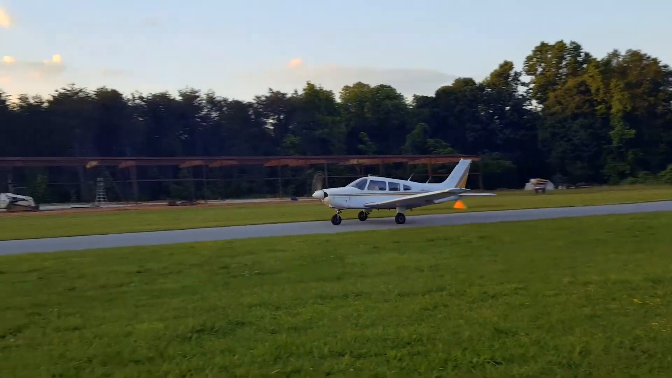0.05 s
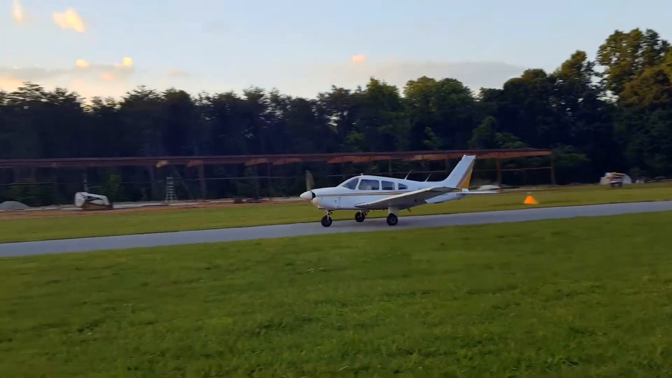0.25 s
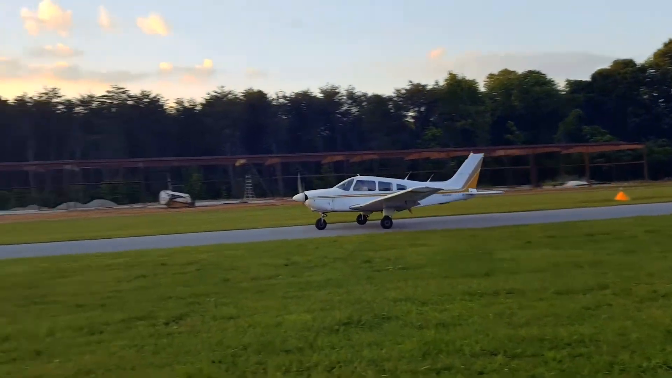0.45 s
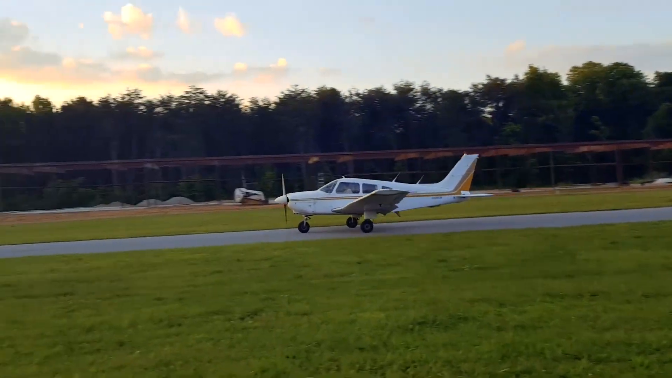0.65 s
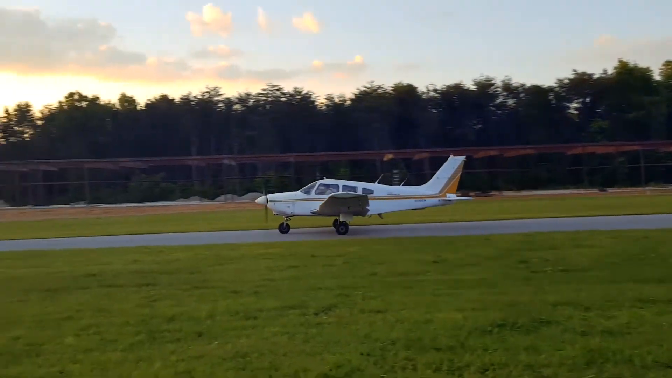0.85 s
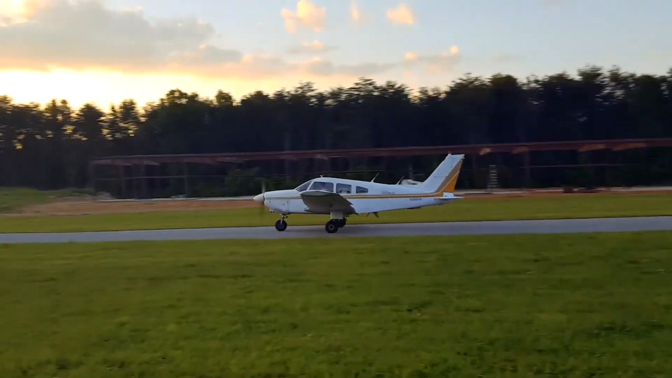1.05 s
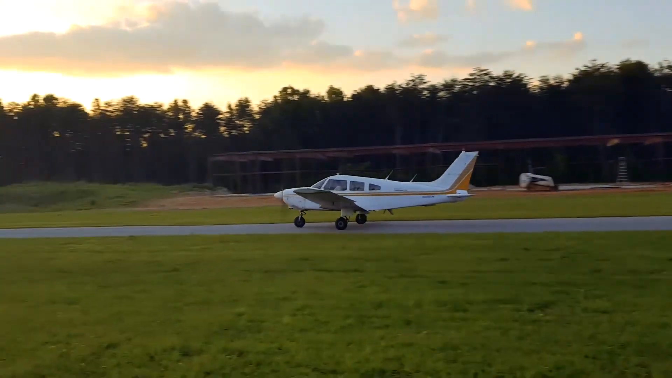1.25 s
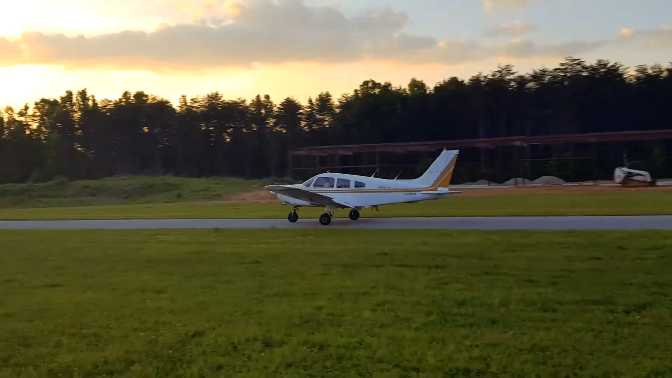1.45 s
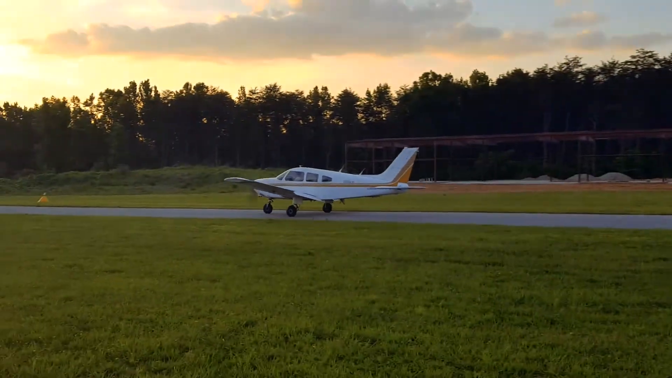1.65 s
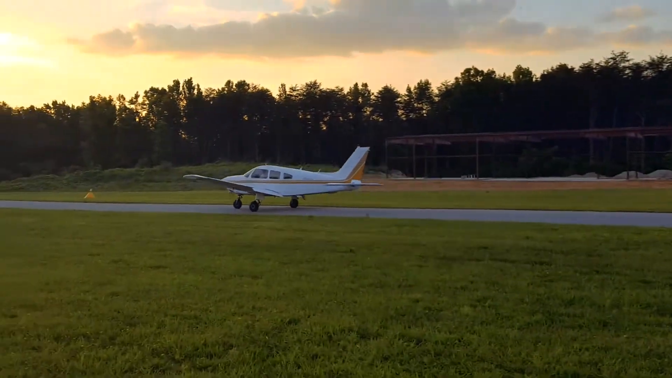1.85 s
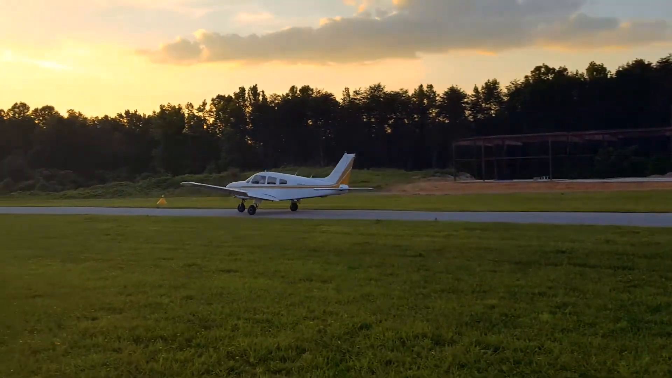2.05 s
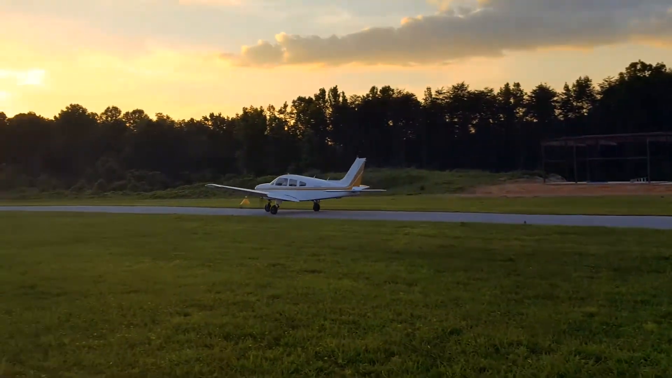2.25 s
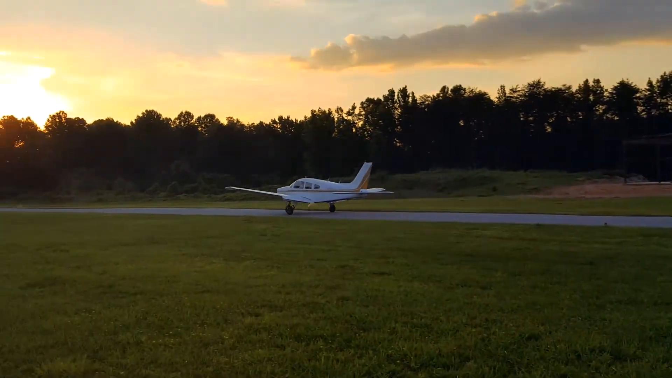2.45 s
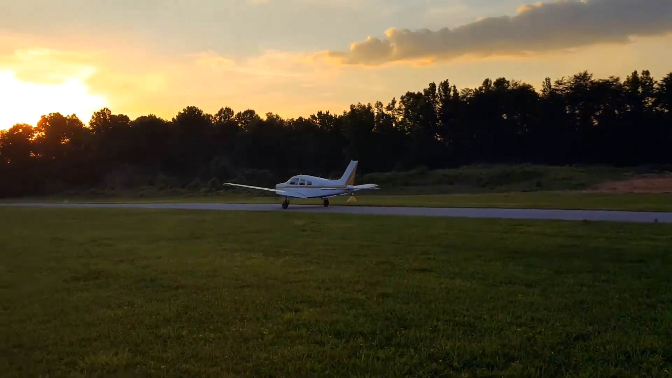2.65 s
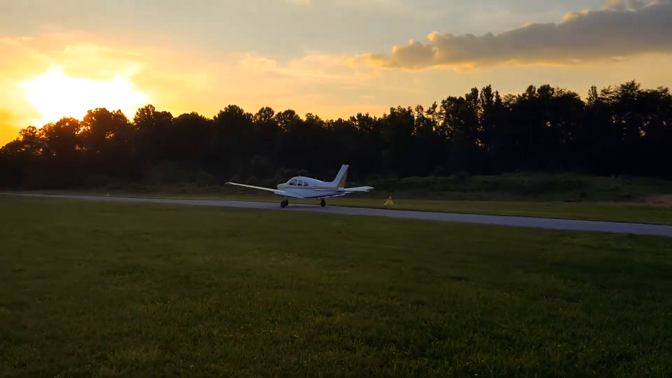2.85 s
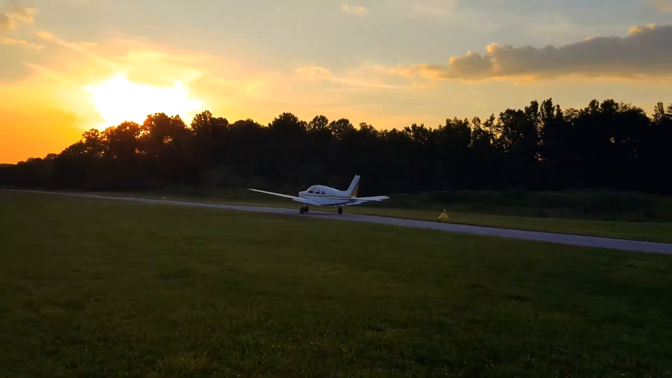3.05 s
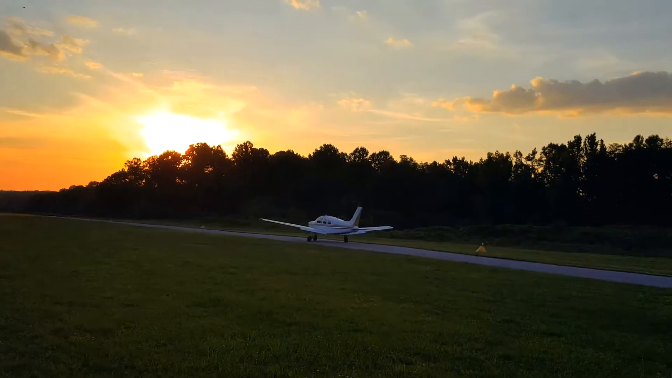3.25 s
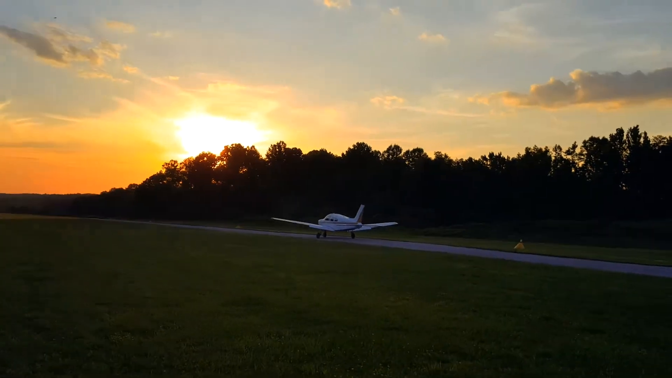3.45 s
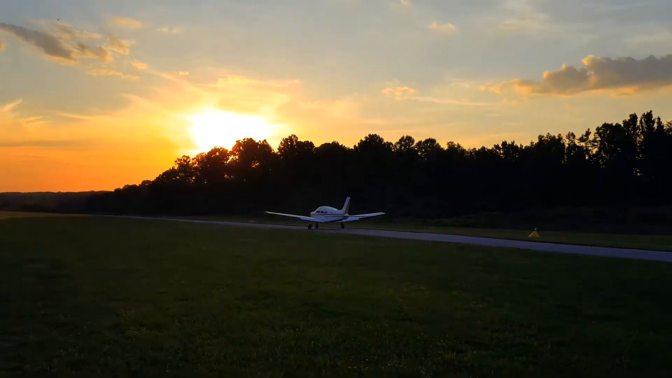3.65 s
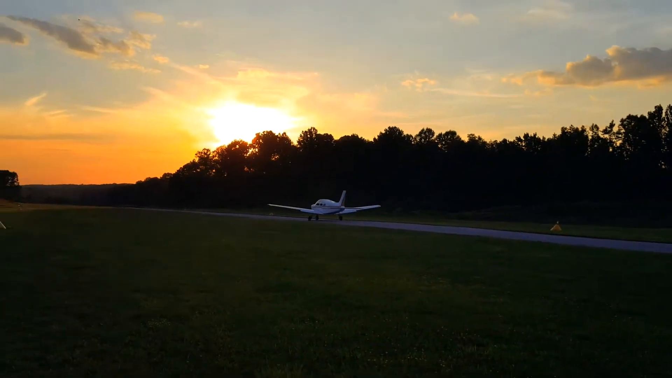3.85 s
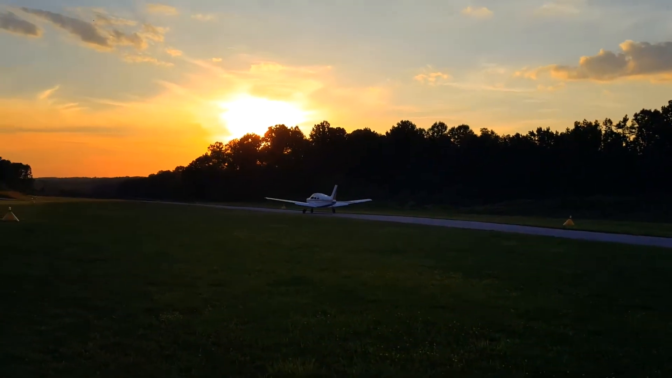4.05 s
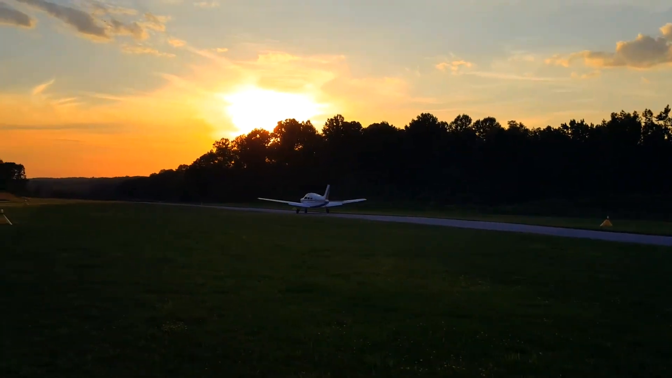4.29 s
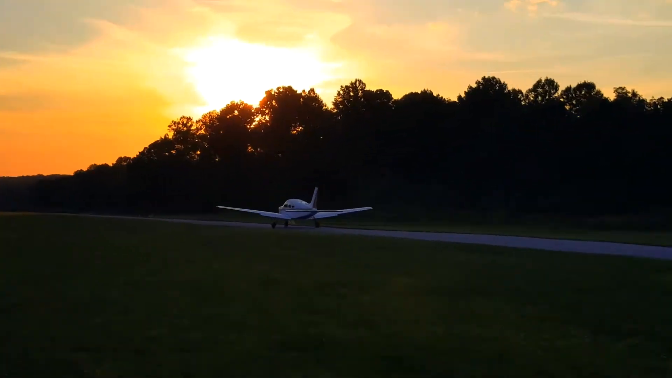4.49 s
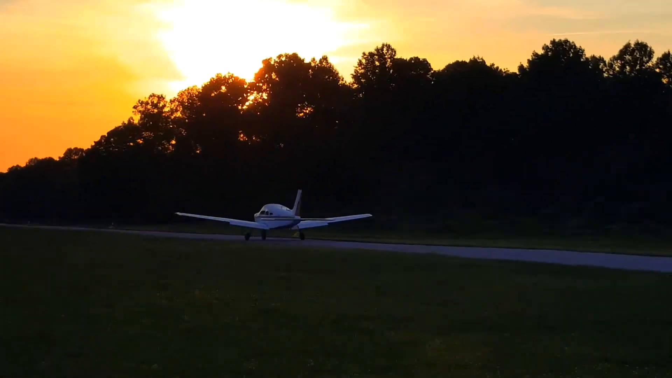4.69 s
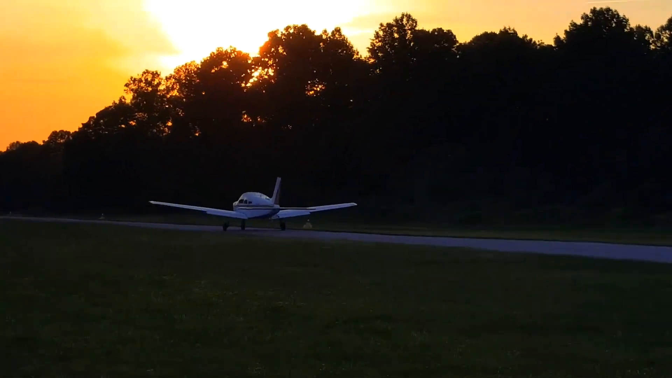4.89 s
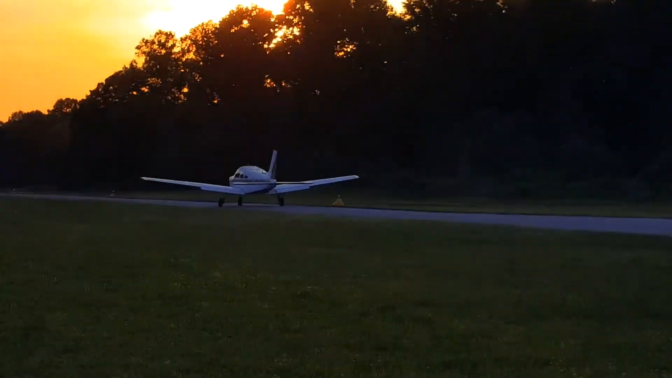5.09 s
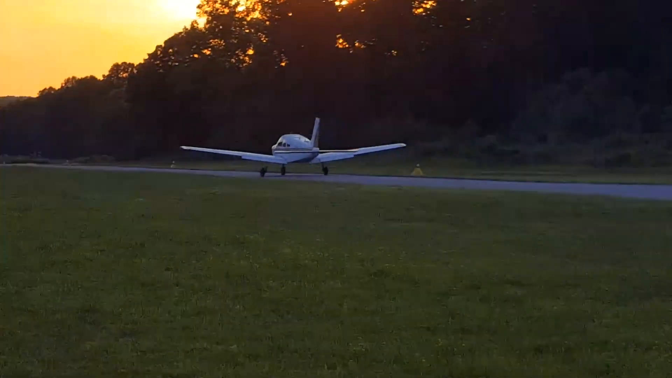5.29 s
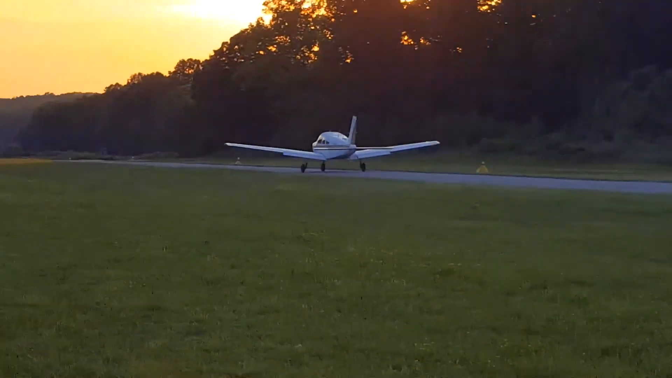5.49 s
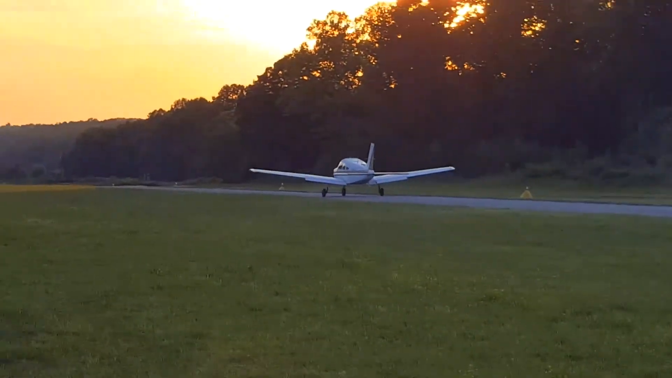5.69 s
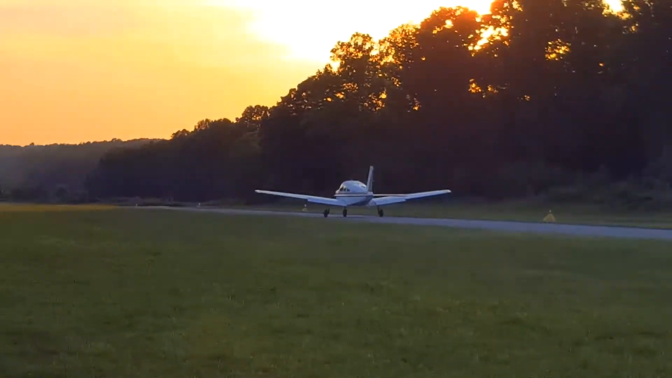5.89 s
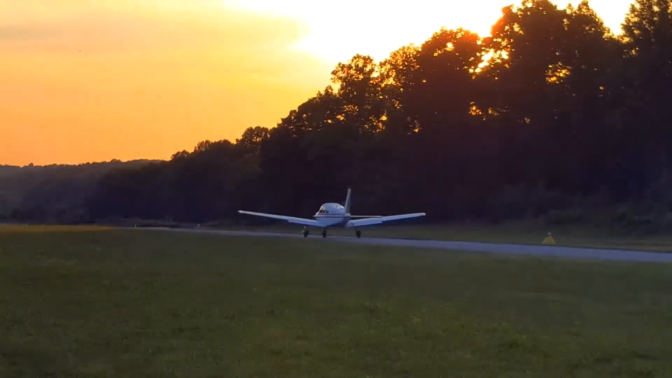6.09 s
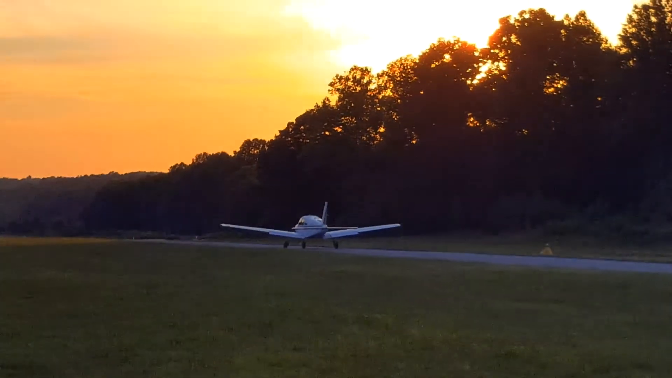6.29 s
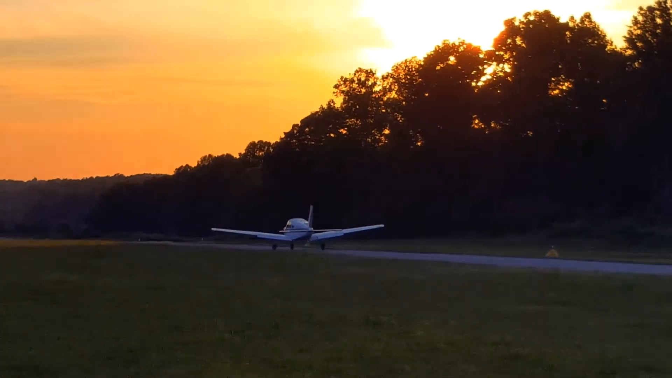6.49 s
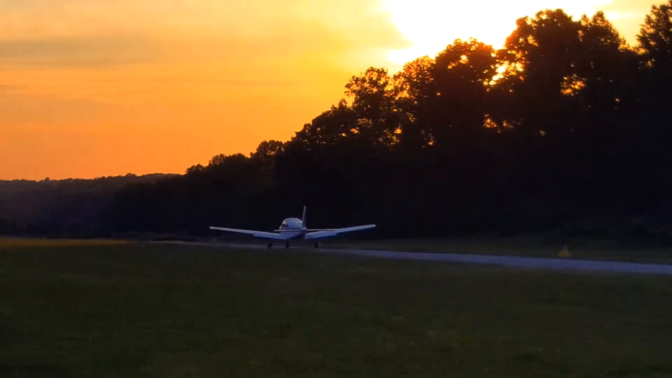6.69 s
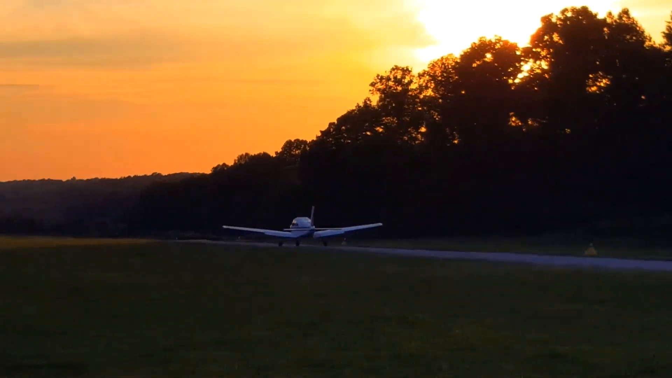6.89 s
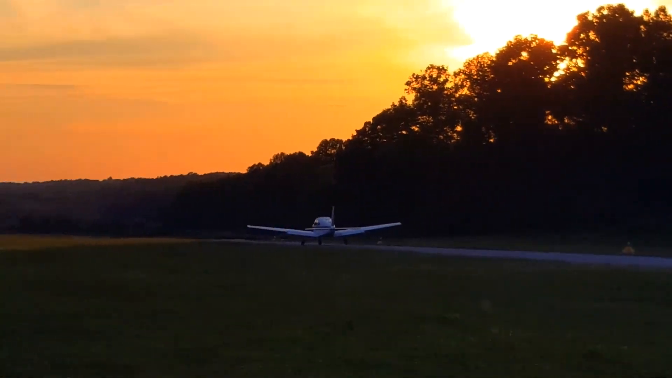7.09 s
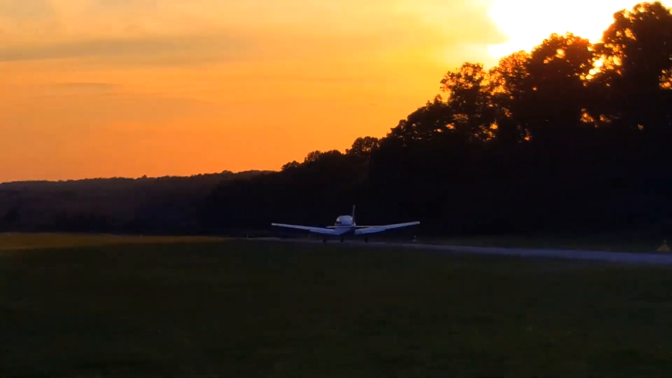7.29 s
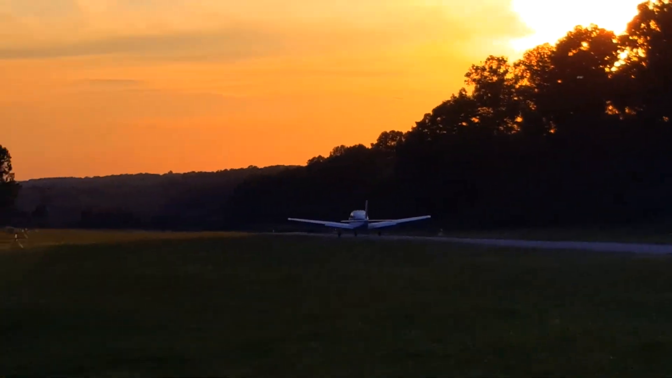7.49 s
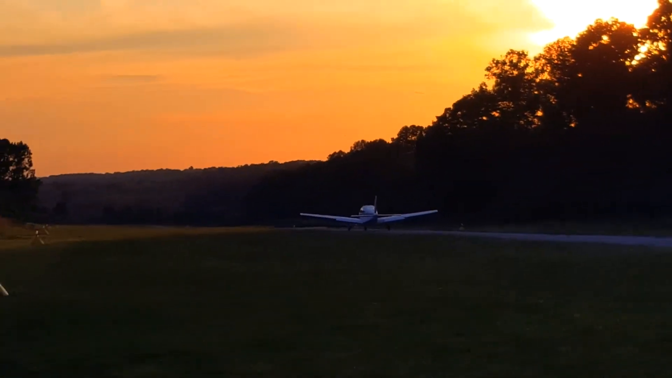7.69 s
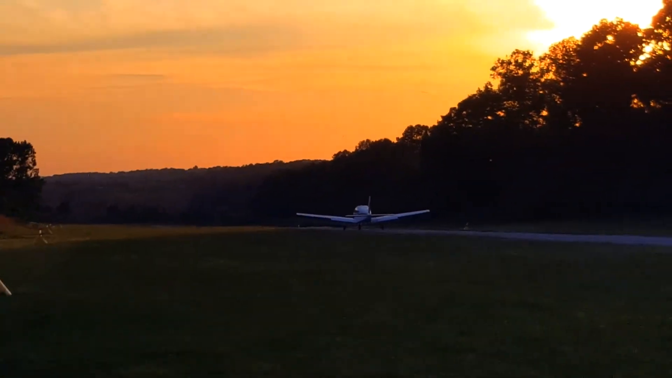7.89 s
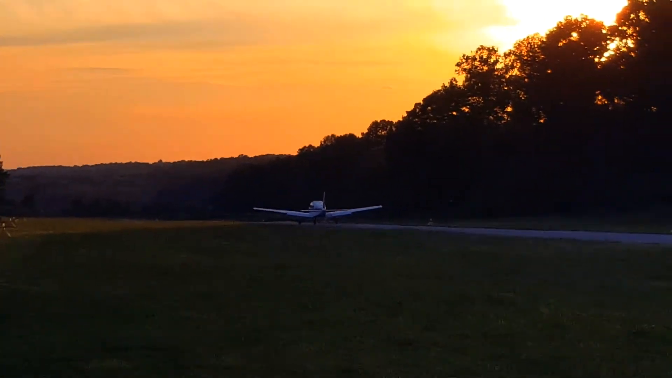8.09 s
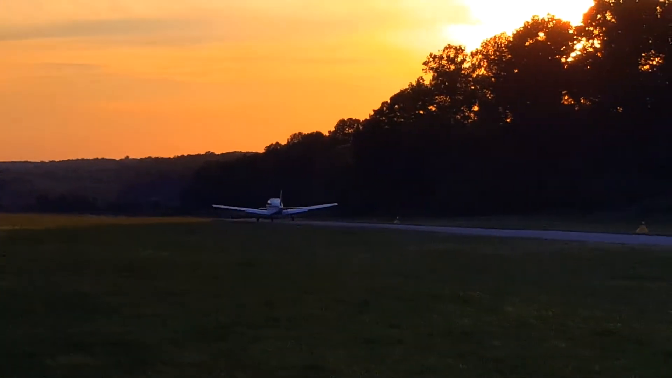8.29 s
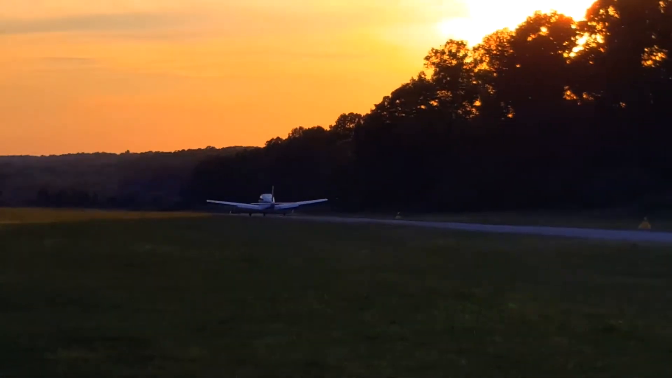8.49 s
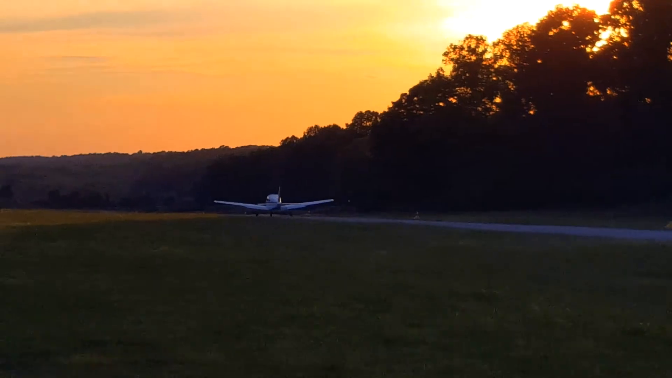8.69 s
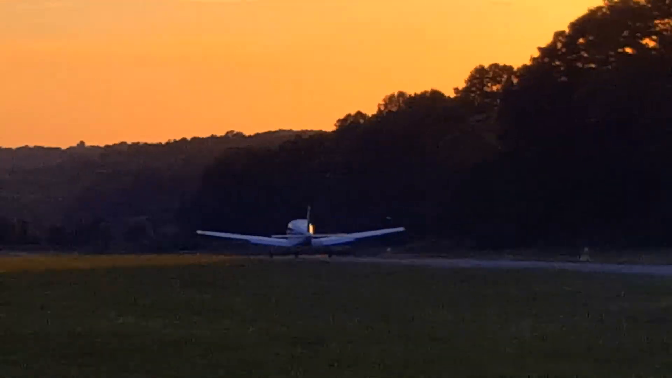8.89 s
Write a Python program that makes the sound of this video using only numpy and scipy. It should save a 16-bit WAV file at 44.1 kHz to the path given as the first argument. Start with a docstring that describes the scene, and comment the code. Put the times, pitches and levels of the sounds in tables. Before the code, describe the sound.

Loud light-aircraft engine drone with rasping exhaust hiss passes and recedes along a tree-lined airstrip, pulsing unevenly and growing dull and distant.

```python
"""A four-cylinder light aeroplane at full power rolls past a hand-held stereo microphone and away
down a strip lined with trees. Firing and blade rate coincide in one falling tone, a sum of sines;
each exhaust beat spits a burst of hiss, shaped noise. An echo from the strip's edge arrives a little
higher in pitch and makes the tone throb. Near the end comes a small tick, a few decaying modes."""
import sys
import numpy as np
from scipy import signal
from scipy.io import wavfile
from scipy.ndimage import uniform_filter1d

SR = 44100
rng = np.random.default_rng(int(sys.argv[2]) if len(sys.argv) > 2 else 0)


def to_linear_factor(level_db):
    """Convert decibel levels (scalar or array-like) to linear amplitude factors."""
    exponent = np.asarray(level_db, float) / 20
    return 10 ** exponent


def output_pcm(signal):
    """Save a mono or channel-first signal as 16-bit PCM at the path in sys.argv[1].

    Samples are clipped to [-1, 1] before scaling.
    """
    pcm = np.clip(np.atleast_2d(signal).T, -1, 1) * 32767
    wavfile.write(sys.argv[1], SR, np.round(pcm).astype(np.int16))


N = 394254


def rms_one(x):
    """Scale to rms 1."""
    return x / np.sqrt(np.mean(x ** 2) + 1e-20)


def in_time(rows):
    """Table columns as curves, one value a sample."""
    s, *columns = np.transpose(rows)
    return [np.interp(np.arange(N) / SR, s, column) for column in columns]


def at_hz(points, hz):
    """Read a table on a log-frequency axis."""
    table_hz, values = np.array(points)[:, 0], np.array(points)[:, 1]
    return np.interp(np.log(hz), np.log(table_hz), values)


def add_db(*levels_db):
    """Level of unrelated sounds together: their powers add."""
    return 10 * np.log10(sum(to_linear_factor(db) ** 2 for db in levels_db))


def drift(corner_hz):
    """Slow chance of spread 1: two-pole lowpassed noise, drawn every 40 samples."""
    pole = np.exp(-2 * np.pi * corner_hz * 40 / SR)
    noise = rng.standard_normal(N // 40 + 2002)
    slow = signal.lfilter([1], [1, -2 * pole, pole * pole], noise)[2000:]  # settled part
    return np.interp(np.arange(N) / 40, np.arange(len(slow)), rms_one(slow - slow.mean()))


def line(turns, level_db, flutter_db):
    """One sine of the given rms level, wavering in turbulent air."""
    level = to_linear_factor(level_db + flutter_db * drift(6.2))
    return np.sqrt(2) * level * np.cos(2 * np.pi * turns)


def order_levels(first_db, second_db):
    """Level curve of every strong multiple: a steady fade plus swells as its beam sweeps past."""
    # steady fade of the higher lines: multiple, start_db, loss_db_per_s
    fades = [(1.5, -39, 1.5), (3, -38, 3.8), (4, -42.5, 3), (5, -50, 2), (6, -58, 2), (5.5, -68, 1.5),
             (6.5, -70, 1), (7.5, -64, 1), (8.5, -68, -1)]
    # swells over the microphone: multiple, peak_s, peak_db, time_to_6db_down_s
    swells = [(3, 0.96, -22.5, .7), (3, .1, -28.5, .4), (4, 1.06, -28, .5), (4, 2.18, -42, .5),
              (3, 2.6, -40, 0.3), (5, 1, -34.5, .45), (5, 0.29, -40.5, 0.35), (6, 0.61, -43, 0.82),
              (1.5, 3.58, -32, 0.75), (4, 3.862, -35, .5), (8.5, 1.92, -43, 0.5), (7.5, 2.32, -46.5, .35),
              (8.5, 3.3, -48.5, .5), (7.5, 3.1, -48.5, 1.2), (6.5, 3.67, -48, 0.7), (5.5, 4.5, -54, 2.6),
              (7.5, 5.62, -57.5, 2.5), (8.5, 6.2, -60.5, 4)]
    s = np.arange(0, N, 64) / SR
    levels_db = {1: first_db, 2: second_db}
    for k, start_db, loss_db_per_s in fades:
        swells_db = [peak_db - 6 * ((s - peak_s) / width_s) ** 2
                     for multiple, peak_s, peak_db, width_s in swells if multiple == k]
        level_db = add_db(start_db - loss_db_per_s * s, *swells_db)
        levels_db[k] = np.interp(np.arange(N) / SR, s, level_db)
    return levels_db


def tone(firings, strong_db, gained, echo_db):
    """Exhaust and blade lines at multiples of the firing rate, direct and by the echo."""
    # phase of the main lines: multiple, phase_turns
    order_turns = [(1, 0), (1.5, .5), (2, .18), (3, .32), (4, .63), (5, .08)]
    # weaker lines that ride on a stronger one: multiple, multiple_followed, level_against_it_db
    weak_orders = [(.5, 1.5, -16), (2.5, 1.5, -0.5), (3.5, 1.5, -17.5), (4.5, 1.5, -17), (7, 6, -1.5),
                   (8, 6, -2), (9, 6, -6), (10, 6, -1.5), (9.5, 8.5, 0), (10.5, 8.5, -8), (11.5, 8.5, -16)]
    pan_db, pan_db_per_s = -1.2, 0.14  # left over right, drifting to the middle

    out = sum(line(k * firings + turn, strong_db[k], flutter_db=0.23 * k) for k, turn in order_turns)
    # half multiples, from uneven cylinders, waver more
    out += sum(line(k * firings + rng.random(), db, flutter_db=1.15 + 4.5 * (k % 1))
               for k, db in strong_db.items() if k > 5)
    out += sum(line(k * firings + rng.random(), strong_db[leader] + db, flutter_db=1.36 + 4.4 * (k % 1))
               for k, leader, db in weak_orders)

    echo_firings = firings + gained
    out += sum(line((k + 1) * echo_firings, db, flutter_db=1.2 + 1.0 * k)
               for k, db in enumerate(echo_db))
    out += line(4 * echo_firings + 0.28, echo_db[2] - 10.5, flutter_db=3.5)
    # foliage scatters the echo into a rough skirt round its second multiple
    out += to_linear_factor(echo_db[1] - 11.0) * drift(13.4) * np.cos(4 * np.pi * echo_firings)

    late = np.r_[np.zeros(6), out[:-6]]  # the left port hears the tone a little late
    pan = to_linear_factor(np.outer([.5, -.5], pan_db + pan_db_per_s * np.arange(N) / SR))
    return np.array([late, out]) * pan


def bursts(firings, sharpness, uneven_db, pair_db):
    """One puff a firing, quick to rise, just before the pressure swing; cylinder pairs alternate."""
    turns = firings + .3
    number = np.floor(turns + .5).astype(int)
    number -= number.min()
    strength_db = uneven_db * rng.standard_normal(2000)[number] + pair_db * (number % 2)
    shape = np.cos(2 * np.pi * turns)
    shape += -0.25 * np.sin(4 * np.pi * turns) + 0.1 * np.cos(4 * np.pi * turns)
    return rms_one(to_linear_factor(strength_db) * np.exp(sharpness * shape))


def patches(hz, frames):
    """Slow chance over time and pitch: turbulent air fades third-octave patches on their own."""
    cells = uniform_filter1d(rng.standard_normal((32, frames)), size=9, axis=1) * 3
    rows = np.clip(3 * np.log2(hz / 20), 0, 31)
    below = np.minimum(rows.astype(int), 30)
    return cells[below] + (rows - below)[:, None] * (cells[below + 1] - cells[below])


def zone_levels(s, rumble_db):
    """Level of the ten hiss zones at times s, low to high; the lesser zones follow their neighbours."""
    # exhaust and blade hiss: time_s, 1.6-3.1_khz_db, 1-1.6_khz_db, 3.1-5.8_khz_db, 7.2-9_khz_db
    hiss_bands = [(0.03, -23.5, -25, -26.5, -37), (0.58, -26.5, -30.5, -30, -38),
                  (0.63, -24.5, -28, -33, -41), (0.97, -29, -29.5, -32.5, -36.5),
                  (1.54, -26, -31.5, -33, -40.5), (1.72, -25, -30.5, -34, -35),
                  (2.14, -22.5, -32, -35.5, -30.5), (2.49, -24, -32.5, -31, -32),
                  (2.81, -26.5, -32.5, -35.5, -31.5), (3.21, -29.5, -33.5, -32, -41.5),
                  (3.73, -32.5, -31, -32.5, -35.5), (3.8, -32, -33, -34, -40.5),
                  (4.65, -27, -35.5, -32, -36.5), (4.89, -29.5, -34, -34, -37),
                  (5.04, -27.5, -33, -34.5, -39), (5.34, -29.5, -41.5, -36.5, -43),
                  (5.61, -37.5, -40.5, -39, -42.5), (5.81, -36.5, -44, -39, -53),
                  (6.38, -36.5, -45, -41.5, -51.5), (7.4, -40, -46.5, -46, -58.5),
                  (8.15, -44, -45.5, -47.5, -54.5), (8.94, -45.5, -46.5, -51, -69)]
    # treble: time_s, 9-12.5_khz_db, above_12.5_khz_db
    treble_bands = [(0.0, -39.5, -41), (0.22, -44.5, -43), (0.62, -46, -48), (2.56, -52.5, -49.5),
                    (3.3, -49, -55), (3.5, -56.5, -56), (3.82, -55, -57), (5.25, -62, -65),
                    (5.59, -67, -75), (5.79, -63, -64), (7.52, -69, -80.5), (8.85, -87, -82)]
    middle, low, upper, peak = (np.interp(s, hiss_bands_s, column)
                                for hiss_bands_s, *columns in [np.transpose(hiss_bands)]
                                for column in columns)
    treble_s, *treble_db = np.transpose(treble_bands)
    top = [np.interp(s, treble_s, column) for column in treble_db]

    # 300-540 and 540-1000 Hz: level when 1-1.6 kHz is at -33 dB, and share of its swing
    under = [db + share * (low + 33) for db, share in [(-48, 0.4), (-39.5, 0.75)]]
    # 5.8-7.2 kHz lies under 3.1-5.8 kHz, and fills in for a while around 6 s
    fill_s, fill_db, fill_width_s = 6, 4.3, 0.5
    gap = upper - 8.5 + fill_db * np.exp(-((s - fill_s) / fill_width_s) ** 2)
    return np.array([rumble_db, *under, low, middle, upper, gap, peak, *top])


def hiss(firings, gained, rumble_db):
    """Puffed noise, coloured frame by frame; the microphone ports tilt and shift each pitch their own way."""
    # borders of the ten level zones: edge_hz
    zone_edges_hz = [300, 540, 1000, 1600, 3100, 5800, 7200, 9000, 12500]
    # colour in the mean of both ports, with the microphone's own peaks; only its shape
    # within a zone counts: pitch_hz, density_db_per_hz
    hiss_colour = [(12, -39), (28, -12), (45, -7), (100, 1.5), (190, 2), (260, -5), (330, -9), (430, -8),
                   (900, -7), (1340, -9), (1750, 0), (2330, 0), (3110, -11.5), (4150, -4.5), (5750, -19.5),
                   (6330, -19), (7060, -10), (7600, -4.5), (8000, -9.5), (8760, -24), (10000, -34),
                   (12600, -38.5), (15100, -37)]
    # port balance: pitch_hz, left_over_right_db
    port_balance = [(60, -7.5), (200, -4), (500, -3.5), (1170, -.5), (1900, -0.5), (2600, -0.5),
                    (3200, -13), (3800, 2), (4300, 3), (5200, 5), (6100, -10), (7000, -5), (8000, -2.5),
                    (9800, -0.5), (15000, -2)]
    # port phase: pitch_hz, left_lead_rad
    port_phase = [(300, -.1), (1200, -.2), (2400, -.9), (3200, -2.8), (4150, -5.8), (5000, -7.4),
                  (5800, -9.0), (6600, -11.6), (7600, -12.2), (9500, -15), (16000, -18)]
    # left-right likeness: pitch_hz, likeness_0_to_1
    port_likeness = [(60, .99), (300, .96), (700, .85), (2000, .86), (4000, .81), (8000, .7), (15000, .5)]
    # left port's extra lag as the hand turns: time_s, lag_ms
    port_lag = [(0, 0.038), (2, -.028), (3.2, 0.02), (8.94, 0.03)]
    sharpness = 0.77
    echo_share_max, echo_from_s, echo_rise_s = 0.46, 2.55, 1  # share of the hiss power by the echo

    t = np.arange(N) / SR
    lag_ms, = in_time(port_lag)
    echo_share = np.clip(echo_share_max * np.tanh((t - echo_from_s) / echo_rise_s), 0, 1)
    direct = np.sqrt(1 - echo_share) * bursts(firings, sharpness, uneven_db=.6, pair_db=1.2)
    echo = np.sqrt(echo_share) * bursts(firings + gained, 0.12 * sharpness, uneven_db=1.2, pair_db=-0.1)
    white = rng.standard_normal((2, 2, N))
    hz, s, puffed = signal.stft(direct * white[0] + echo * white[1], SR, nperseg=2048, noverlap=1536)
    steady = signal.stft(white[1], SR, nperseg=2048, noverlap=1536)[2]
    hz = np.maximum(hz, 1)
    at = np.minimum((s * SR).astype(int), N - 1)

    zone = np.searchsorted(zone_edges_hz, hz)
    shared, own = np.where(zone[:, None] == 0, steady, puffed)  # the rumble does not puff
    colour = to_linear_factor(at_hz(hiss_colour, hz)) * (hz < 15950)
    levels_db = zone_levels(s, rumble_db[at])
    levels_db -= 10 * np.log10(np.bincount(zone, colour ** 2) / len(hz))[:, None]  # rms 1 in each zone
    octaves_above = np.log2(hz[:, None] / np.r_[1e-9, zone_edges_hz, 1e9])
    blend = -np.diff(np.clip(octaves_above / .2 + .5, 0, 1))  # soft zone edges
    gain = colour[:, None] * to_linear_factor(blend @ levels_db + 0.94 * patches(hz, len(s)))

    alike = np.clip(at_hz(port_likeness, hz), 0, 1)[:, None]
    lag_rad = 2 * np.pi * np.outer(hz, lag_ms[at] / 1000)
    turned = np.exp(1j * (lag_rad - at_hz(port_phase, hz)[:, None]))
    right = alike * turned * shared + np.sqrt(1 - alike ** 2) * own
    tilt = to_linear_factor(.5 * at_hz(port_balance, hz))[:, None]
    # levels hold for the mean of both ports
    sum_power = abs(tilt + alike * turned / tilt) ** 2 + (1 - alike ** 2) / tilt ** 2
    gain = gain * 2 / np.sqrt(sum_power)
    ports = gain * np.array([shared * tilt, right / tilt])
    return signal.istft(ports, SR, nperseg=2048, noverlap=1536)[1][:, :N]


def tick():
    """A small click near the microphone rings a few short modes, softened by a lowpass."""
    # before the lowpass: start_s, level_db
    tick_starts = [(8.539, -22)]
    # modes: pitch_hz, level_against_tick_db, t60_s
    tick_modes = [(1200, -1, .013), (1750, -7, .008), (2600, -5, .007), (4200, -4, .007)]
    out = np.zeros(N)
    age_s = np.arange(2000) / SR
    for start_s, tick_db in tick_starts:
        for hz, mode_db, t60_s in tick_modes:
            envelope = to_linear_factor(tick_db + mode_db - 60 * age_s / t60_s)
            out[round(start_s * SR):][:2000] += envelope * np.sin(2 * np.pi * hz * age_s)
    return signal.sosfilt(signal.butter(4, 6500., fs=SR, output="sos"), out)


def scene():
    """The aeroplane's tone and hiss share one firing count, direct and by the echo; the tick joins them."""
    # direct sound: time_s, firing_rate_hz, first_multiple_db, second_multiple_db
    direct_pass = [(0.0, 79.97, -32, -15.5), (0.4, 80.08, -23, -17), (0.8, 78.44, -19, -15),
                   (1.2, 77.27, -18, -15.5), (1.6, 76.14, -17, -19), (2.4, 74.86, -15, -23),
                   (2.8, 74.56, -16.5, -24), (3.2, 74.67, -16, -26), (4.0, 73.64, -22, -47),
                   (5.2, 73.2, -23.5, -51), (6.0, 72.94, -31, -41), (6.4, 72.97, -25.5, -33),
                   (6.8, 72.86, -29.5, -35.5), (7.2, 72.9, -24, -39), (7.6, 72.74, -31.5, -54),
                   (8.94, 72.32, -38, -50)]
    # echo, its path shrinking against the direct one:
    # time_s, path_gained_wavelengths, first_multiple_db, second_multiple_db
    echo_pass = [(1.6, 0.48, -50, -42), (2.2, 2.4, -34, -43), (2.6, 3.07, -32, -34),
                 (3.0, 4.24, -29.5, -28), (3.4, 5.17, -17.5, -18.5), (4.0, 6.4, -16.5, -19.5),
                 (4.4, 7.67, -18, -26), (4.75, 8.56, -22.5, -21), (5.0, 9.24, -32, -22.5),
                 (5.2, 9.75, -28, -24.5), (5.45, 10.16, -23, -26.5), (5.8, 10.79, -19, -31.5),
                 (6.15, 11.2, -29, -35), (6.4, 11.61, -31, -37.5), (6.9, 12.45, -34, -43),
                 (7.25, 13.85, -31, -41.5), (7.6, 14.54, -33, -42.5), (7.85, 15.55, -37, -41.5),
                 (8.05, 16.08, -30, -45), (8.25, 16.56, -33.5, -48.5), (8.6, 17.49, -45, -47.5),
                 (8.94, 18.76, -47, -47)]
    rate_hz, first_db, second_db = in_time(direct_pass)
    gained, *echo_db = in_time(echo_pass)
    firings = np.cumsum(rate_hz) / SR
    # noise under 300 Hz: against the direct tone, and against the echo's second multiple
    rumble_db = add_db(first_db - 18.5, second_db - 18.5, echo_db[1] - 10.5)
    echo_db.append(echo_db[1] - 15)  # the echo's third multiple
    lines = tone(firings, order_levels(first_db, second_db), gained, echo_db)
    return lines + hiss(firings, gained, rumble_db) + tick()


def low_pass(x):
    """Removes everything above the highest recorded frequency."""
    return signal.sosfilt(signal.butter(12, 16920, fs=SR, output="sos"), x)


def record(dry):
    """Peaks are rounded by a tanh curve."""
    mix = 1.431 * np.tanh(dry / 1.36)
    return low_pass(mix)


dry = scene()
out = record(dry)
output_pcm(out)
```